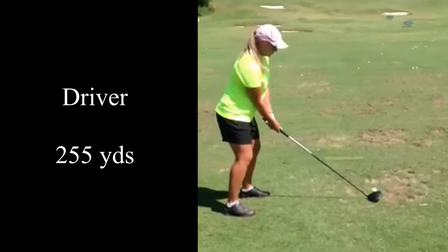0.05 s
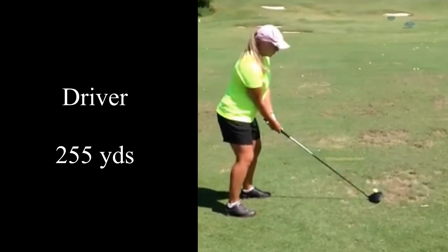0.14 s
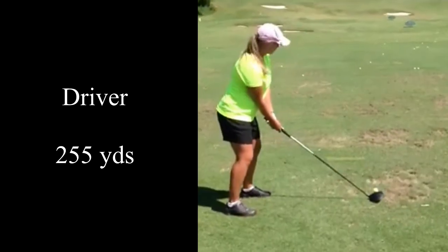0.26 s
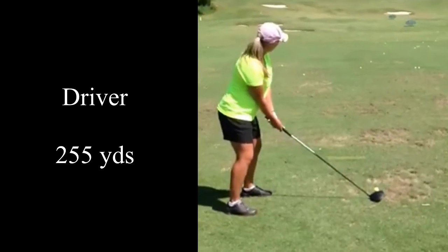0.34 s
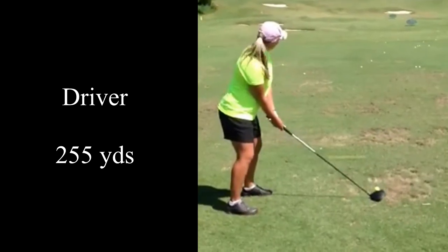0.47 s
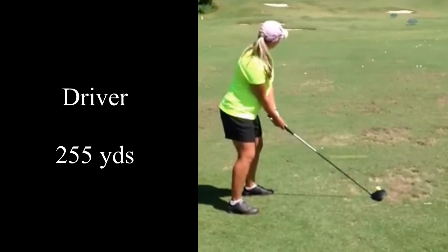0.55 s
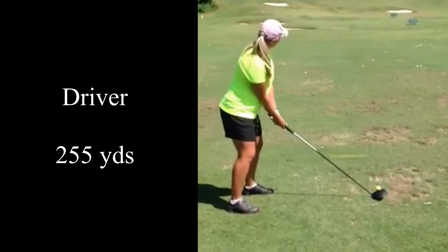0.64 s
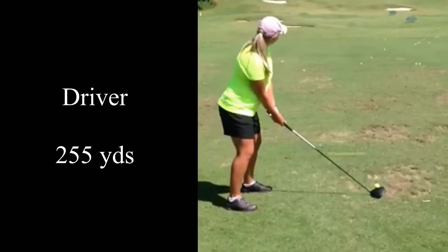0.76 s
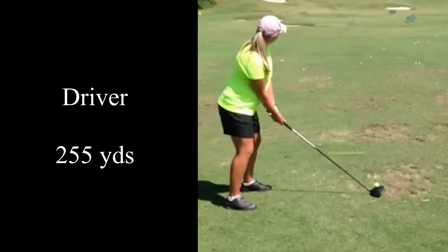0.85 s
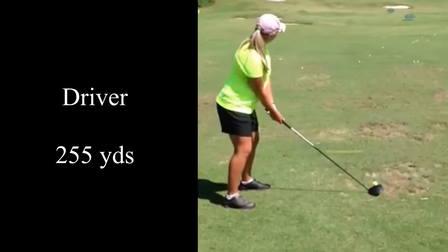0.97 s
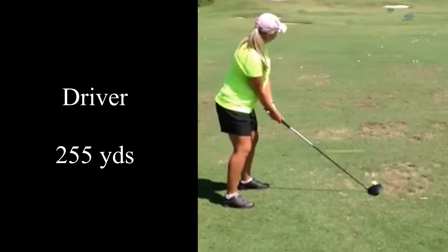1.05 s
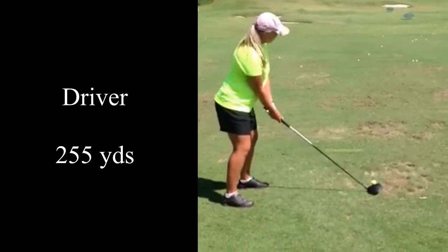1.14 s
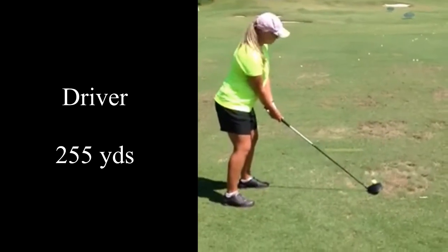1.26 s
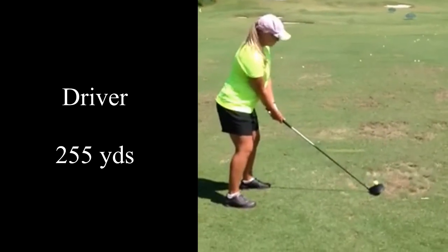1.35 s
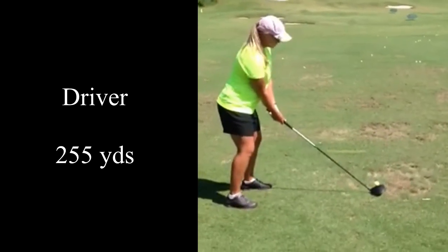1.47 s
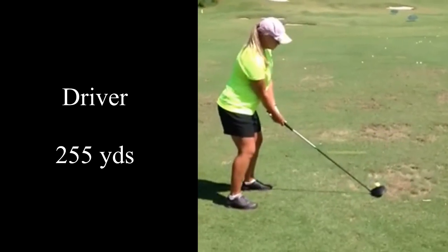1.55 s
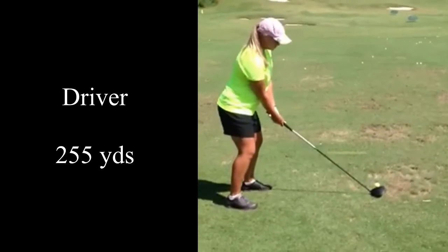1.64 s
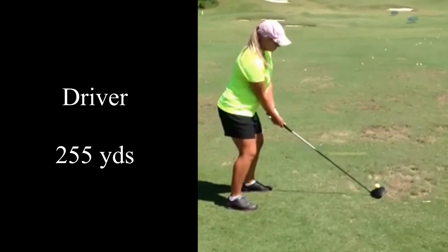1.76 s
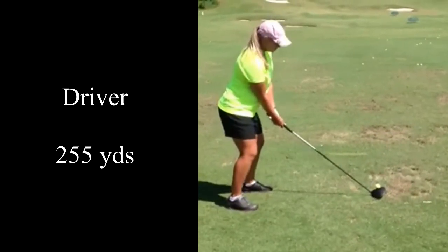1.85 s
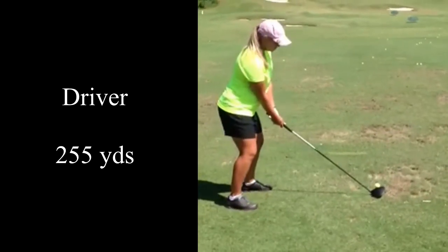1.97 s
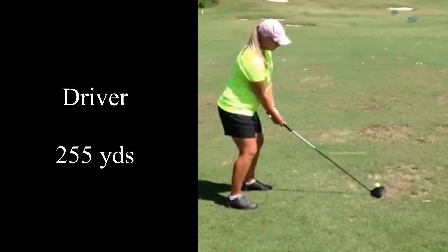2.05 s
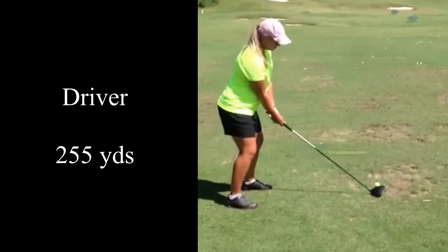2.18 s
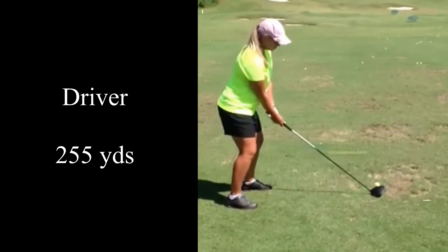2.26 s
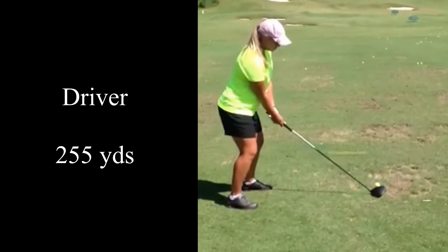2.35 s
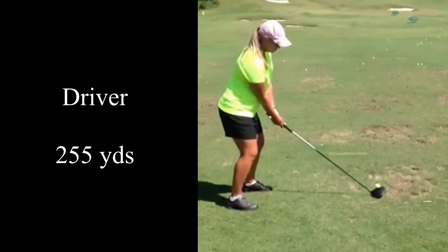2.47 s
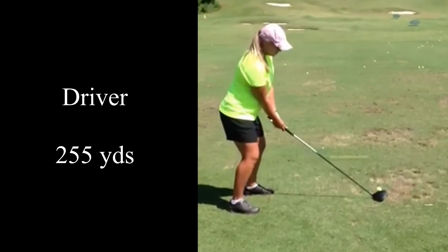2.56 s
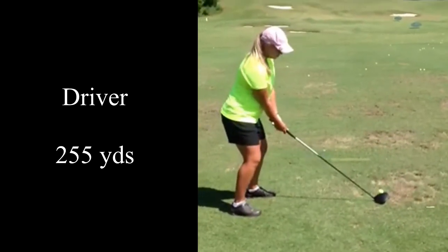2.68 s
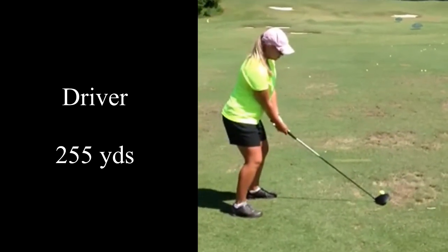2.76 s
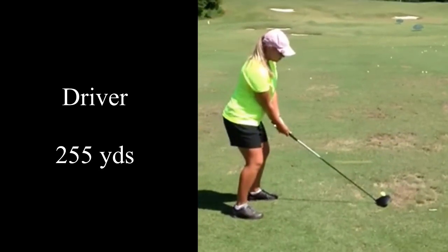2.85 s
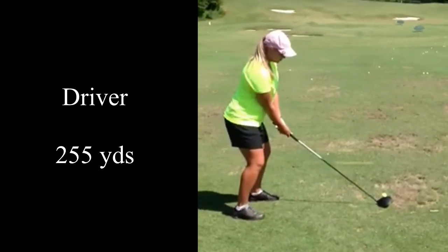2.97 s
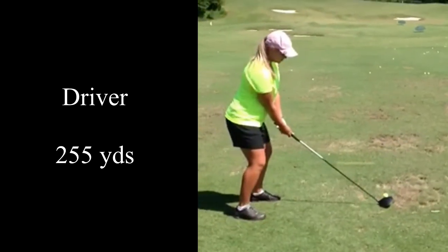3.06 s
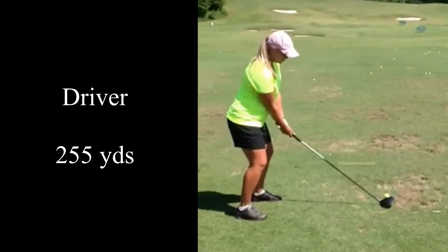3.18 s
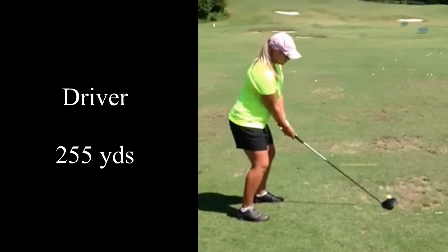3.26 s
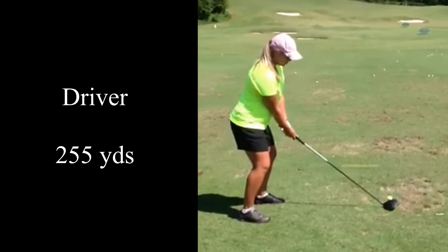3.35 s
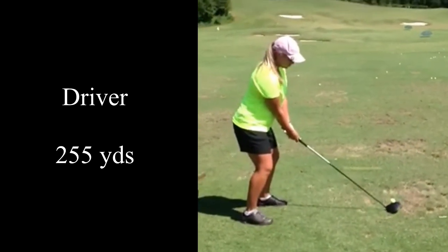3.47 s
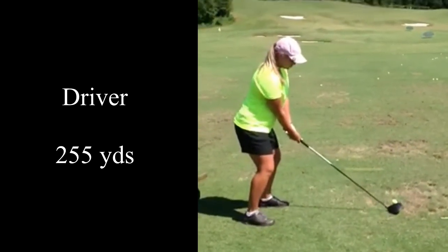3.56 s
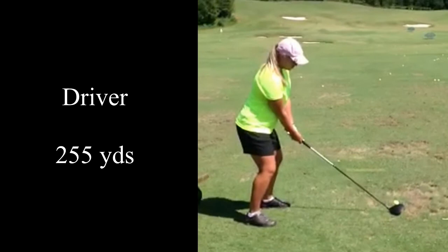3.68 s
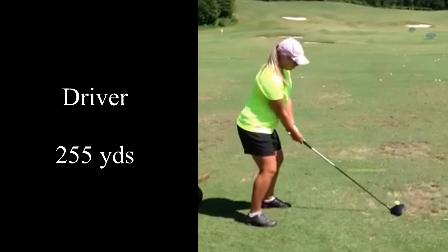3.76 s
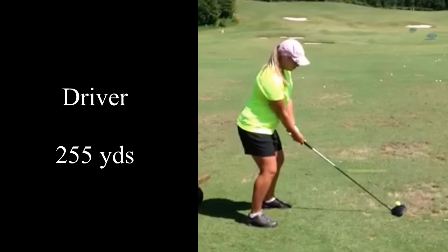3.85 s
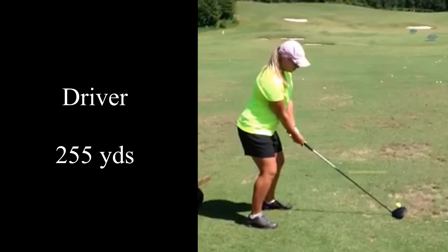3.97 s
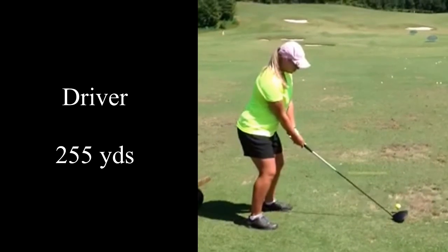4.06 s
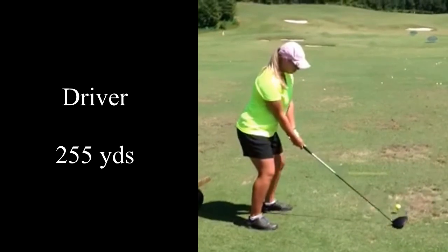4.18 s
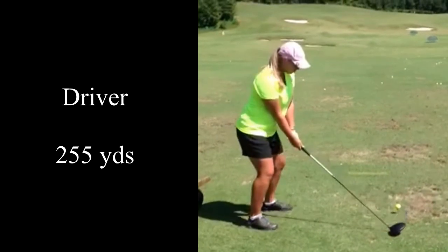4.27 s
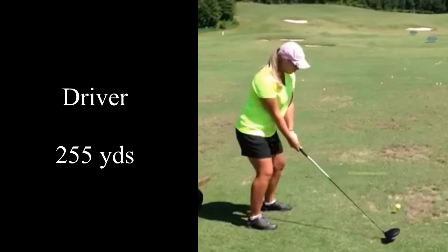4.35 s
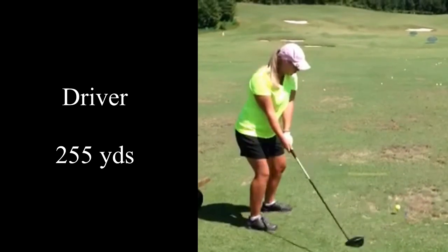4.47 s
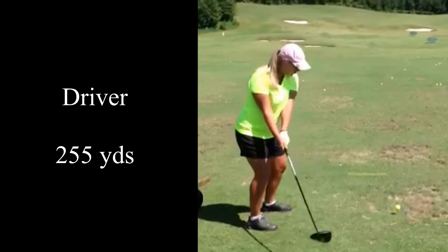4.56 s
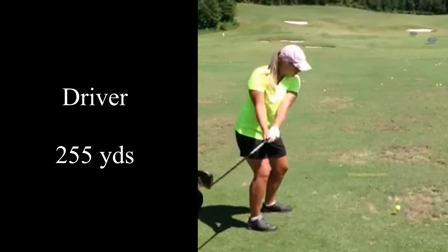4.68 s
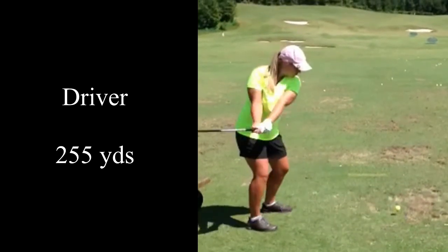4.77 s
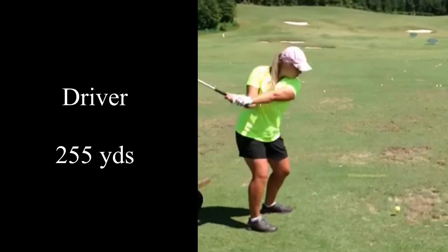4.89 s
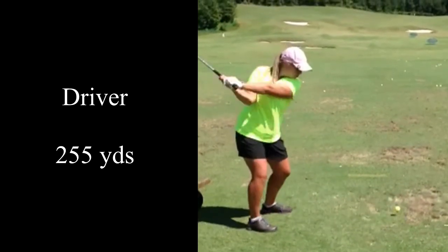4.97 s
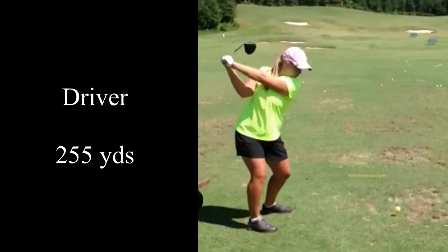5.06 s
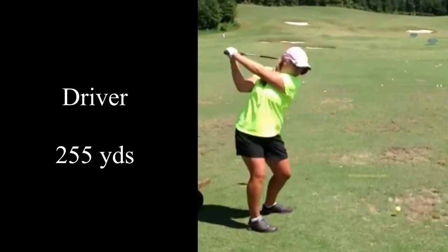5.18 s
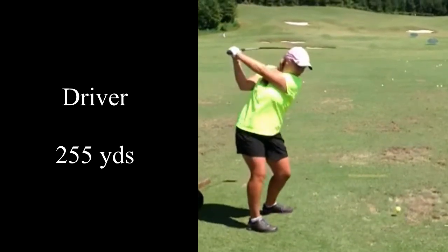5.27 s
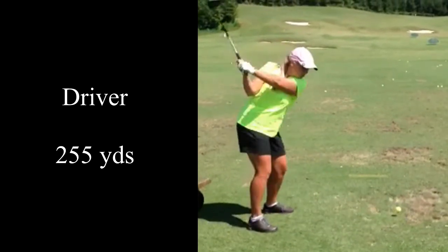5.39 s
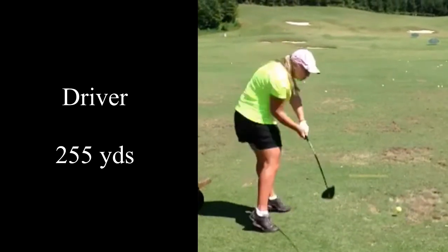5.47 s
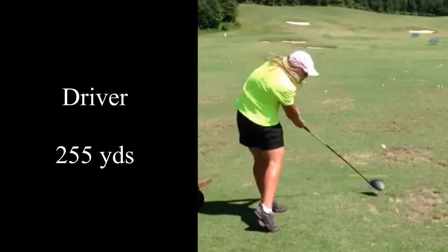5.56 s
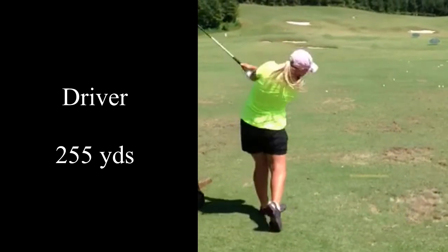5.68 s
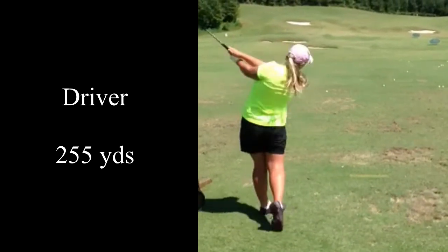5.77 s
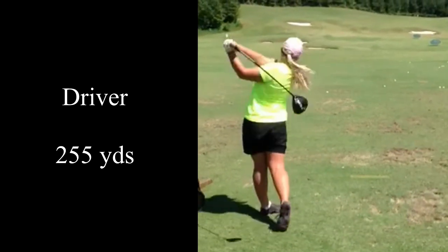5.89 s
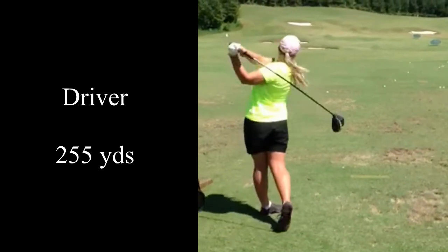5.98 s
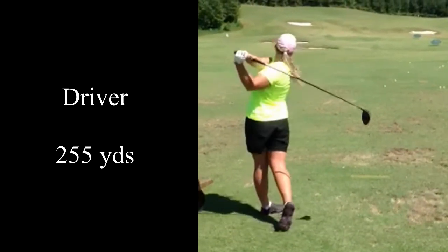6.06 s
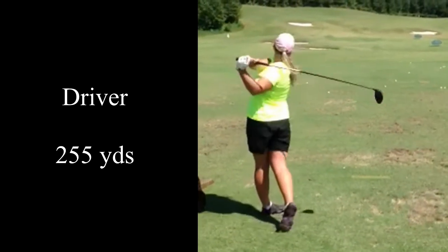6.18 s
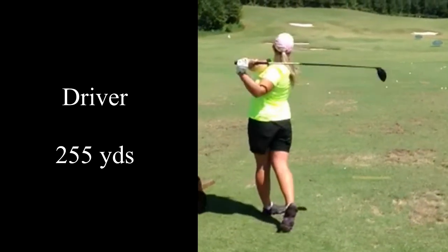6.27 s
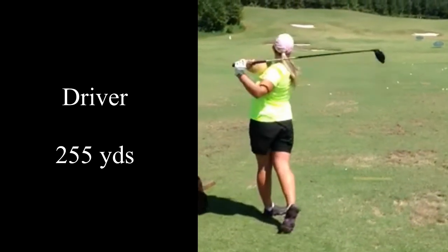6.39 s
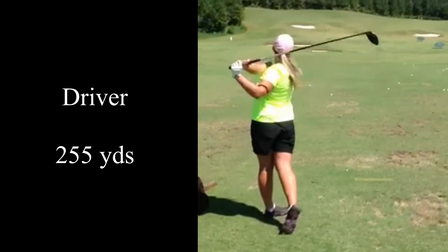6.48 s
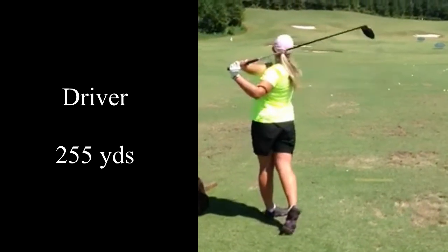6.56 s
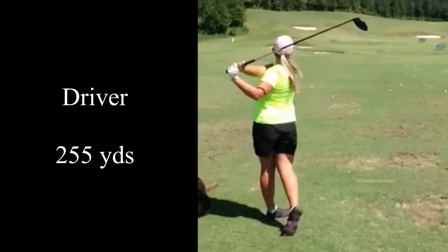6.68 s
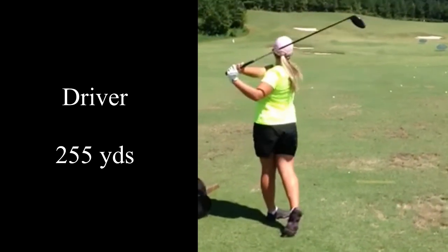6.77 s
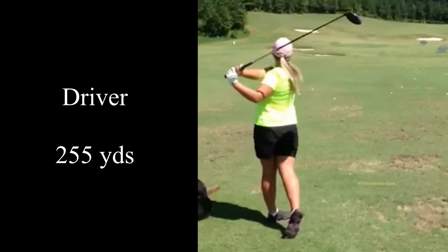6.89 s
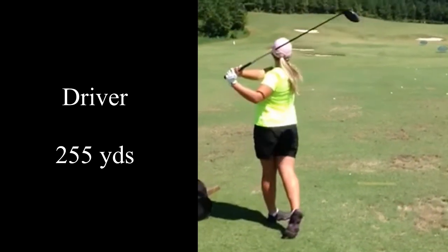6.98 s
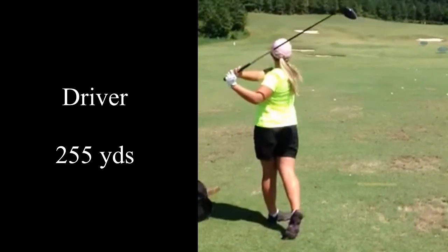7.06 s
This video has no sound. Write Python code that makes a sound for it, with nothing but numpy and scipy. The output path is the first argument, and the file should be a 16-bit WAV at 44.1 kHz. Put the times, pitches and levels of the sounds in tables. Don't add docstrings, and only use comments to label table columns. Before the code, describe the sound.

Open grassy practice tee, single microphone. Raspy high cricket buzzes swell and stop about twice a second, with dry ticks over a soft hiss. A few small knocks on the microphone and a faint far metal clink come early; distant birds whistle thinly. Late on, a club swishes briefly and cracks a ball with a hard metallic snap, and the insects carry on.

```python
import sys
import numpy as np
from scipy import signal
from scipy.fft import rfft, irfft
from scipy.io import wavfile
from scipy.ndimage import map_coordinates

SR = 44100
rng = np.random.default_rng(int(sys.argv[2]) if len(sys.argv) > 2 else 0)


def elevation(decibels):
    levels = np.asarray(decibels, float)
    return 10 ** (levels / 20)


def dump(signal):
    limited = np.clip(np.atleast_2d(signal).T, -1, 1)
    pcm = np.round(limited * 32767).astype(np.int16)
    wavfile.write(sys.argv[1], SR, pcm)


N = 314433

# [frequency_hz, density_db]
AIR_SPECTRUM = [(30, -26.5), (60, -26), (110, -7), (174, -3.5), (295, -8.5), (512, -12.5), (1050, -17),
                (1600, -20.5), (2200, -18.5), (3400, -15), (4900, -17), (7700, -8.5), (10000, -11),
                (16000, -12.5)]
RUMBLE_DB, HISS_DB, HISS_FOLLOWS = -55, -47, .15
CALMING_DB_S = 0.62
# [frequency_hz, width_hz, level_db]
CHORUS_BANDS = [(3644, 270, 0.4), (2850, 1106, -2), (3930, 850, 0.5)]
# [time_s, level_db]
CHORUS_LEVEL = [
    (0, -59.5),
    (1, -63.5),
    (3.2, -70),
    (4, -64.5),
    (4.5, -59.5),
    (5.5, -57.5),
    (5.9, -59.5),
    (7.13, -57.5),
]
# [start_s, length_s, from_hz, to_hz, level_db]
FAR_CALLS = [
    (2.18, .085, 2480, 2400, -61),
    (2.30, .07, 2920, 2940, -68),
    (2.43, .07, 2450, 2320, -67),
    (2.575, .05, 2850, 2870, -64),
    (2.80, .03, 2850, 2830, -59),
    (2.832, .05, 2520, 2350, -60),
    (2.865, .1, 2350, 2340, -64),
    (5.28, .05, 5100, 5350, -63),
            (4.39, .04, 2800, 3050, -65), (4.53, .03, 2520, 2620, -61), (4.60, .025, 2400, 2420, -63),
          (4.62, .035, 2200, 1950, -62), (4.66, .045, 2850, 2650, -64), (4.70, .055, 2540, 2330, -61),
          (4.765, .03, 2350, 2350, -62), (4.83, .058, 2680, 3080, -59), (4.93, .06, 2100, 2250, -64),
          (4.99, .06, 2500, 2620, -64), (5.09, .035, 3550, 3570, -61), (5.32, .03, 3520, 3540, -62)]
CLINK_S, CLINK_ECHO_S, CLINK_ECHO_DB = 1.396, .032, -6
# [frequency_hz, level_db, t60_s]
CLINK_MODES = [
    (1200, -54, .14),
    (4780, -51, .14),
    (5500, -49, .065),
]

# [start_s, end_s, top_db]
BUZZ_PHRASES = [(0, 0.645, -52.5), (0.67, 1.18, -49.5), (1.346, 1.756, -48.5), (1.966, 2.383, -48.5),
                (2.59, 2.98, -47.5), (3.18, 3.586, -48.5), (3.777, 4.208, -47), (4.4, 4.849, -47),
                (4.997, 5.518, -47), (5.746, 6.092, -49), (6.234, 6.644, -45), (6.782, 7.2, -46.5)]
SWELL_DB, SWELL_SHARE, SAG_DB = 8.5, .59, 1.7
HIGH_FADE_S, HIGH_LAST_SHARE = 1.64, 0.28
STROKES_PER_S, STROKE_WANDER = 69.8, 1.5
# [frequency_hz, width_hz, level_db]
BUZZ_WING = [(7665, 190, 1.5), (8770, 910, -7), (6790, 2500, -12.5), (12400, 1600, -8.5)]
HIGH_WING = [(8210, 430, -2), (9050, 890, -8), (11650, 2900, -12.5), (5770, 1900, -17.5)]
LOW_WING = [(8140, 510, -1.5), (6560, 1200, -2.5), (8850, 1700, -5.5), (11800, 1800, -10.5)]
# [start_s, peak_db]
HIGH_TICKS = [(0.0368, -36.5), (0.6559, -35.5), (1.2506, -37.5), (1.8302, -34.5), (2.445, -34),
              (3.0544, -36), (3.6745, -37), (4.2708, -38), (4.8773, -34.5), (5.4921, -35), (6.0483, -38),
              (6.6367, -38)]
LOW_TICKS = [(0.3416, -35.5), (1.0684, -34), (1.774, -36.5), (2.393, -36), (3.018, -36), (3.6112, -35.5),
             (4.2748, -33), (4.9237, -34), (6.166, -33.5), (6.7203, -32)]
FAINT_TICKS = [(0.8084, -36), (2.5734, -39), (3.1737, -44), (3.7638, -39), (4.346, -39), (4.9501, -39),
               (6.1429, -36), (6.748, -37.5)]

# [start_s, level_db, start_hz, end_hz, fall_s]
BUMPS = [
    (.594, -44, 1000, 190, .011),
    (.852, -41, 1800, 190, .015),
    (.922, -44, 900, 190, .012),
    (1.0315, -30, 1600, 165, .0065),
    (1.803, -41, 600, 200, .006),
    (1.832, -39, 2000, 190, .013),
    (5.797, -41, 400, 250, .007),
]
BUMP_TREBLE_SHARE, BUMP_DECAY_S, BUMP_BEND = 0.39, 0.01, 1.88

# [time_s, level_db]
SWISH_LEVEL = [
    (5.459, -55.5),
    (5.5, -53.5),
    (5.528, -44),
    (5.555, -30.5),
    (5.597, -32.5),
    (5.612, -21.5),
]
SHED_HZ, SHED_FOLLOWS = 777, .13

IMPACT_S = 5.6132
SQUASH_MS, SQUASH_DB = 0.67, 2.5
# (pitch_hz, level_db, t60_s)
BALL_TONE = (1240, -8, .018)
HEAD_HZ = [1470, 3525, 3650, 3700, 5370, 5705, 5820, 6280, 6560, 6850, 7030, 7590, 8490, 9700]
# [level_db, t60_s]
HEAD_RING = [(-20, .045), (-21, .05), (-16, .15), (-16, .08), (-14, .065), (-20, .065), (-21, .07),
             (-18, .075), (-11, .05), (-8, .028), (-11, .04), (-7, .048), (-14, .025), (-15, .03)]
# [frequency_hz, density_db]
CRACK_SPECTRUM = [(180, -13.5), (400, -19.5), (750, -5.5), (2200, -13.5), (2900, -16), (3700, -0.5),
                  (4750, -26), (5400, -2.5), (7600, -12.5), (10000, -5.5), (12400, -12), (16000, -23)]
# [level_db, t60_s]
CRACK_TAILS = [
    (-6, 0.028),
    (-14, 0.12),
]
# [start_s, length_s, from_hz, to_hz, level_db]
FLIGHT_RING = [
    (5.629, .034, 3700, 3760, -30),
    (5.65, .075, 3780, 4050, -53),
    (5.64, .05, 5450, 5800, -48),
    (5.695, .07, 2070, 2100, -61),
]

DUCK_FROM_DB, DUCK_SLOPE, DUCK_ATTACK_S, RECOVER_DB_S = -21, 0.3, 0.009, 4
MIC_LOW_HZ, STEP_HZ, STEP_DB, CUTOFF_HZ = 68, 12600, -17, 15800


def rms_one(x):
    return x / np.sqrt(np.mean(x ** 2) + 1e-20)


def clock():
    return np.arange(N) / SR


def butter(x, order, hz, kind="low"):
    return signal.sosfilt(signal.butter(order, hz, kind, fs=SR, output="sos"), x)


def coloured(spectrum, count):
    hz, level_db = np.transpose(spectrum)
    bins = np.fft.rfftfreq(count, 1 / SR) + 1
    weight = elevation(np.interp(np.log(bins), np.log(hz), level_db))
    return rms_one(irfft(rfft(rng.standard_normal(count)) * weight, count))


def drift(rate):
    knots = rng.standard_normal(1100)
    return map_coordinates(knots, [clock() * rate % 1090], order=3)


def resonate(x, peaks):
    out = 0
    for k, (hz, width_hz, level_db) in enumerate(peaks):
        r = np.exp(-np.pi * width_hz / SR)
        b = [(1 - r * r) / 2, 0, (r * r - 1) / 2]
        a = [1, -2 * r * np.cos(2 * np.pi * hz / SR), r * r]
        twice = signal.lfilter(b, a, signal.lfilter(b, a, x))
        out = out + (-1) ** k * elevation(level_db) * twice
    return out


def add(out, start_s, x):
    i = round(start_s * SR)
    out[i:i + len(x)] += x[:N - i]


def glides(rows, blur_hz, blur):
    out = np.zeros(N)
    noise = butter(rng.standard_normal((2, N)), 2, blur_hz)
    scattered = (rms_one(noise[0]) + 1j * rms_one(noise[1])) / np.sqrt(2)
    shake = np.sqrt(1 - blur) + np.sqrt(blur) * scattered
    for start_s, length_s, from_hz, to_hz, level_db in rows:
        u = np.linspace(0, 1, round(length_s * SR))
        phase = 2 * np.pi * np.cumsum(from_hz + (to_hz - from_hz) * u) / SR
        tone = shake[round(start_s * SR):][:len(u)] * np.exp(1j * phase)
        envelope = 1.7 * np.abs(np.sin(np.pi * u ** .7)) ** .6
        add(out, start_s, elevation(level_db) * envelope * tone.real)
    return out


def open_air():
    air = coloured(AIR_SPECTRUM, N)
    rumble = rms_one(butter(air, 2, 1300))
    hiss = rms_one(butter(air, 2, 1300, "high"))
    rumble_db = RUMBLE_DB + 0.61 * drift(4.8)
    chorus_db = np.interp(clock(), *np.transpose(CHORUS_LEVEL))
    hiss_db = HISS_DB + HISS_FOLLOWS * (chorus_db - chorus_db.mean()) - CALMING_DB_S * clock()
    chorus = rms_one(resonate(rng.standard_normal(N), CHORUS_BANDS))
    return elevation(rumble_db) * rumble - elevation(hiss_db) * hiss + elevation(chorus_db + 1.9 * drift(25)) * chorus


def far_calls():
    return glides(FAR_CALLS, blur_hz=60, blur=.15)


def clink():
    out, t = np.zeros(N), np.arange(round(.1 * SR)) / SR
    notes = [elevation(level_db - 60 * t / t60) * np.sin(2 * np.pi * hz * t) for hz, level_db, t60 in CLINK_MODES]
    add(out, CLINK_S, sum(notes))
    add(out, CLINK_S + CLINK_ECHO_S, elevation(CLINK_ECHO_DB) * notes[-1])
    return out


def buzz():
    t = clock()
    cycle = np.cumsum(STROKES_PER_S + STROKE_WANDER * drift(2.5)) / SR + 0.08 * drift(14)
    stroke = .12 + (.5 - .5 * np.cos(2 * np.pi * cycle)) ** 1.2
    teeth = stroke * elevation(0.54 * drift(35)) * rng.standard_normal(N)
    low = rms_one(resonate(teeth, BUZZ_WING))
    high = rms_one(resonate(teeth[::-1], HIGH_WING))
    share = np.clip(HIGH_LAST_SHARE + np.exp(-(t / HIGH_FADE_S) ** 2), 0, 1)
    phrases = 0
    for start, end, top_db in BUZZ_PHRASES:
        top = start + SWELL_SHARE * (end - start)
        swell_db = top_db + np.interp(t, [start, top, end], [-SWELL_DB, 0, -SAG_DB])
        gate = np.interp(t, [start - .03, start, end, end + 0.0081], [0, 1, 1, 0])
        phrases = phrases + elevation(swell_db) * gate
    return phrases * (np.sqrt(1 - share) * low + np.sqrt(share) * high)


def ticks(rows, wing, length_s, level_db):
    u = np.linspace(0, 1.3, round(1.58 * length_s * SR))
    shape = np.interp(u, [0, .04, .3, 1, 1.3], [0, 0.89, 1.0, 0.52, 0.22])
    gate = np.zeros(N)
    for start_s, peak_db in rows:
        add(gate, start_s, elevation(peak_db + level_db) * shape)
    return gate * rms_one(resonate(rng.standard_normal(N), wing))


def bumps():
    out, t = np.zeros(N), np.arange(round(.08 * SR)) / SR
    for start_s, level_db, start_hz, end_hz, fall_s in BUMPS:
        late = t / fall_s
        hz = end_hz + (start_hz - end_hz) * np.clip(1 - late, 0, 1) ** BUMP_BEND
        rising = BUMP_TREBLE_SHARE + (1 - BUMP_TREBLE_SHARE) * late ** 2
        swell = np.where(late < 1, rising, np.exp(-(t - fall_s) / BUMP_DECAY_S))
        sweep = swell * np.sin(2 * np.pi * np.cumsum(hz) / SR)
        rattle = coloured([(60, -20), (200, 0), (start_hz, -6), (1.4 * start_hz, -30), (16000, -70)], len(t))
        add(out, start_s, elevation(level_db) * (sweep + rattle * elevation(-12 - 60 * t / 0.051)))
    return butter(out, 2, 90, "high")


def swish():
    s, level_db = np.transpose(SWISH_LEVEL)
    t = clock()
    speed_db = np.interp(t, s, level_db)
    phase = 2 * np.pi * np.cumsum(SHED_HZ * elevation(SHED_FOLLOWS * (speed_db - level_db[-1]))) / SR
    slow = butter(rng.standard_normal((2, N)), 2, 150)
    core = rms_one(slow[0] * np.cos(phase) + slow[1] * np.sin(phase))
    skirt = coloured([(80, -25.5), (200, -4), (420, -8.5), (1200, -5), (2500, -19), (5000, -22),
                      (12000, -27), (16000, -33.5)], N)
    gate = np.interp(t, [s[0] - .02, s[0], s[-1], s[-1] + 0.0057], [0, 1, 1, 0])
    lumps = elevation(2.5 * drift(140))
    return elevation(speed_db) * gate * (elevation(-3.5) * lumps * core + elevation(-4.5) * skirt)


def impact():
    t = np.arange(round(.3 * SR)) / SR
    u = t / (SQUASH_MS / 1000)
    blow = elevation(SQUASH_DB) * np.interp(u, [0, .3, .5, .75, 1, 1.15], [0, 1, -.5, -1, -.4, 0])
    ball_hz, ball_db, ball_t60 = BALL_TONE
    blow = blow + elevation(ball_db - 60 * t / ball_t60) * np.sin(2 * np.pi * ball_hz * t)
    rise = np.clip(u - .5, 0, 1)
    for hz, (level_db, t60), start in zip(HEAD_HZ, HEAD_RING, rng.random(len(HEAD_HZ))):
        blow = blow + rise * elevation(level_db - 60 * t / t60) * np.sin(2 * np.pi * (hz * t + start))
    for level_db, t60 in CRACK_TAILS:
        blow = blow + rise * elevation(level_db - 60 * t / t60) * coloured(CRACK_SPECTRUM, len(t))
    blow = butter(blow, 1, 300, "high")
    out = glides(FLIGHT_RING, blur_hz=120, blur=.55)
    add(out, IMPACT_S, blow)
    return out


def scene():
    insects = buzz() + ticks(HIGH_TICKS, HIGH_WING, 0.012, level_db=-6)
    insects += ticks(LOW_TICKS, LOW_WING, 0.012, level_db=-8.5)
    insects += ticks(FAINT_TICKS, BUZZ_WING, 0.009, level_db=-7)
    return (open_air() + far_calls() + clink() + insects + bumps() + swish() + impact())[None]


def band_limit(x):
    return signal.sosfilt(signal.butter(12, 16460, fs=SR, output="sos"), x)


def record(dry):
    t = clock()
    over_db = DUCK_SLOPE * np.clip(20 * np.log10(np.abs(dry) + 1e-9) - DUCK_FROM_DB, 0, None)
    held_db = np.maximum.accumulate(over_db + RECOVER_DB_S * t, axis=1) - RECOVER_DB_S * t
    r = np.exp(-1 / (DUCK_ATTACK_S * SR))
    duck_db = signal.lfilter([1 - r], [1, -r], held_db)
    ducked = butter(dry, 2, MIC_LOW_HZ, "high") * elevation(-duck_db)
    clipped = ducked / (1 + np.abs(ducked) ** 6) ** (1 / 6)
    hz = np.fft.rfftfreq(N, 1 / SR)
    step = elevation(STEP_DB * np.clip((hz - STEP_HZ) / 120, 0, 1)) * (hz < CUTOFF_HZ)
    return band_limit(irfft(rfft(clipped) * step, N))


dry = scene()
out = record(dry)
dump(out)
```